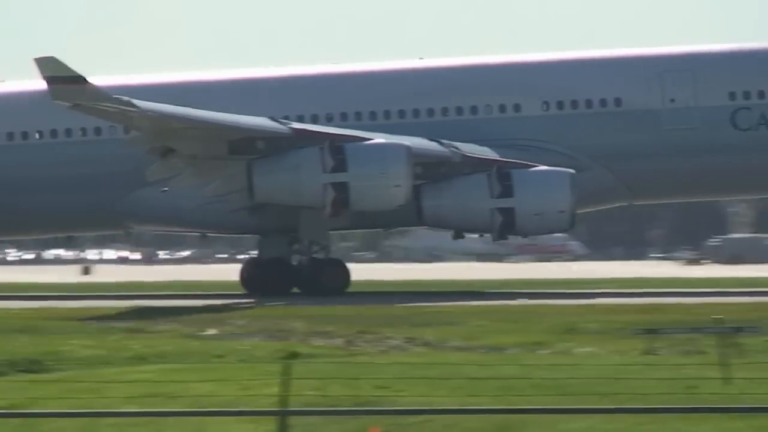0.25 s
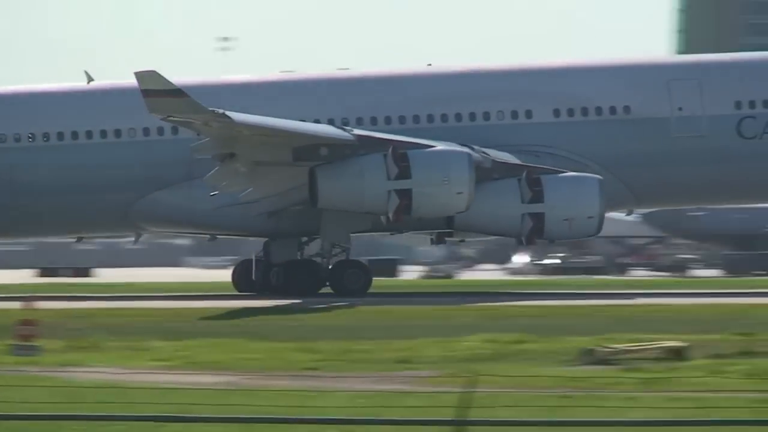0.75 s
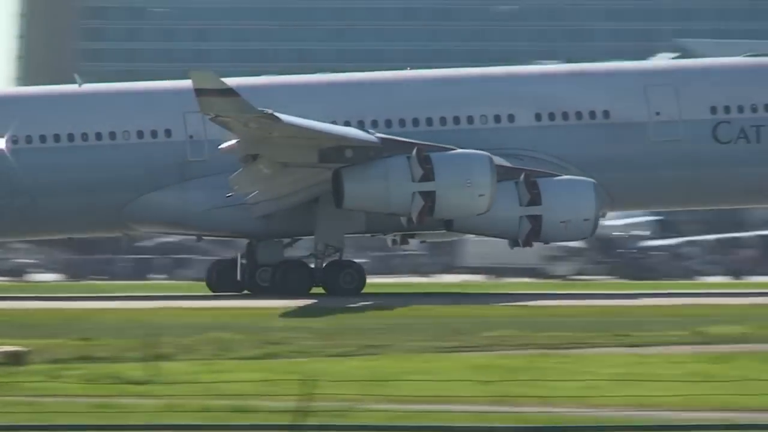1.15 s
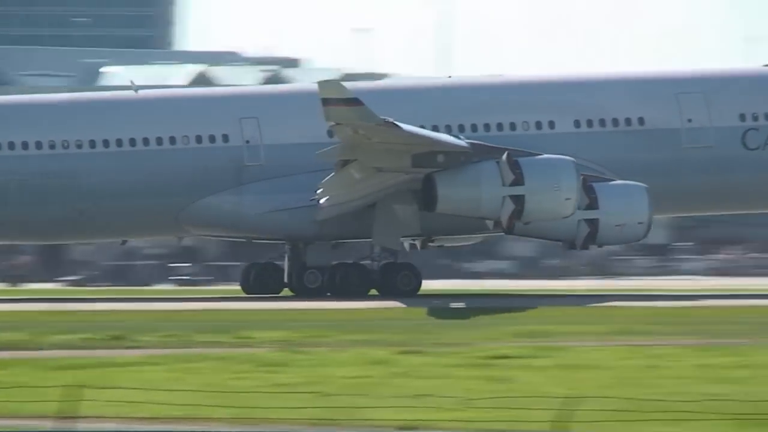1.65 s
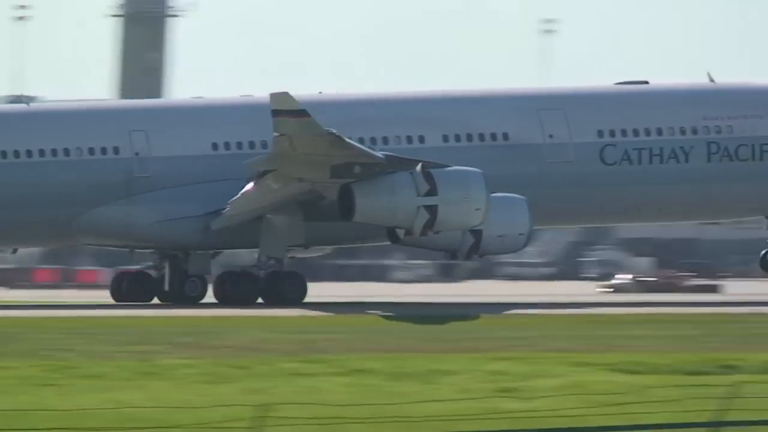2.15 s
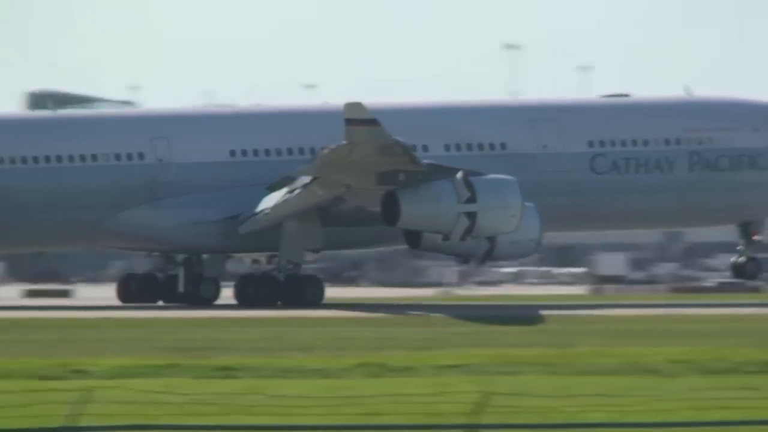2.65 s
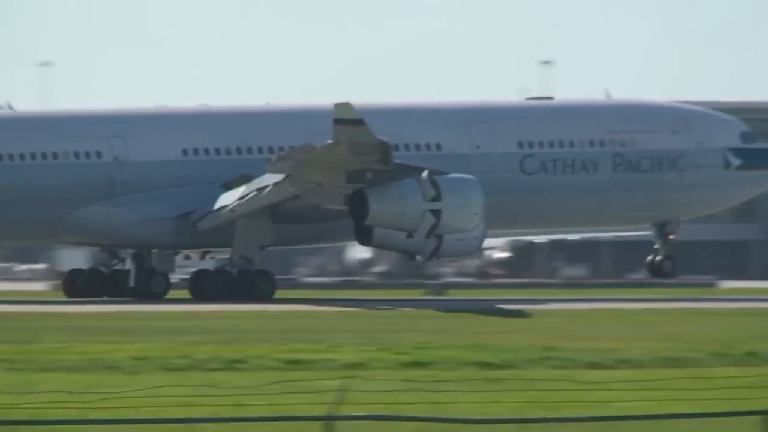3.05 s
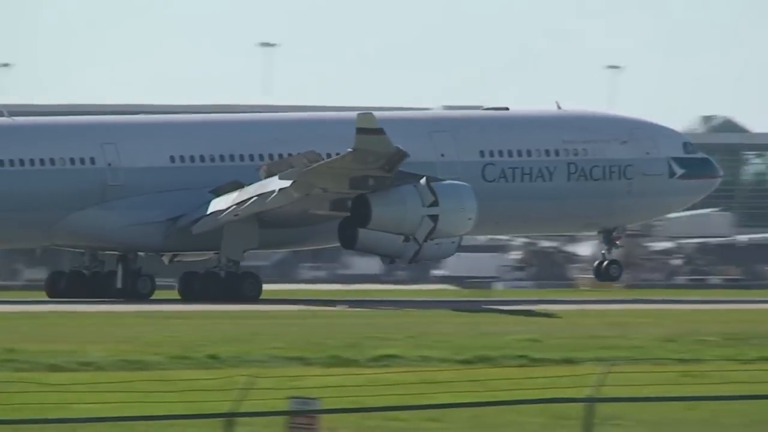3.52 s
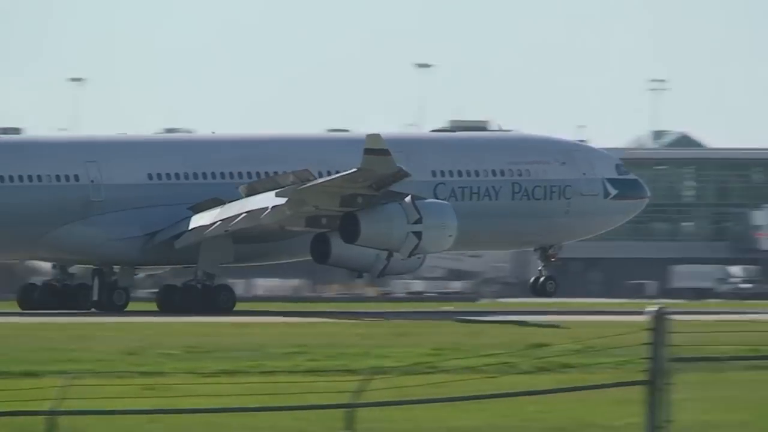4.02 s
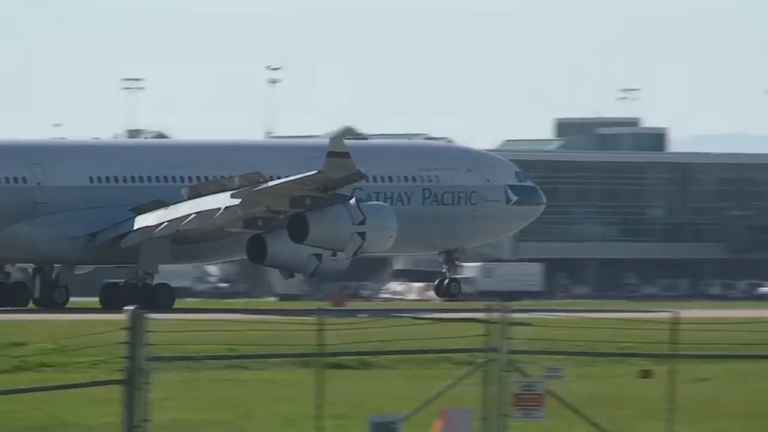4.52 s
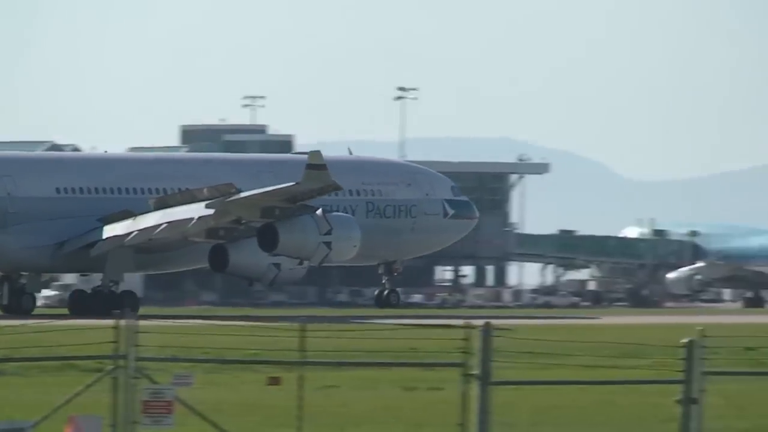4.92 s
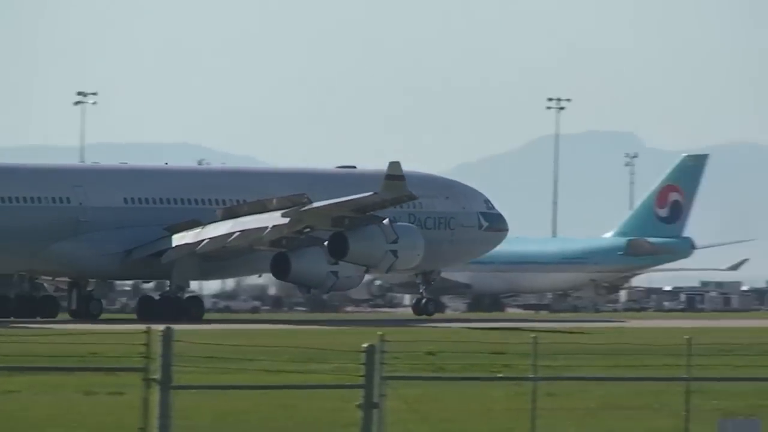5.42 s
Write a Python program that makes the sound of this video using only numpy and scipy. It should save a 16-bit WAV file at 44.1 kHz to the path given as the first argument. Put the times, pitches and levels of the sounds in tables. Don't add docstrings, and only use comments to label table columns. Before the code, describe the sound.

A four-engine jet airliner rolls along a runway with reversers open, heard from a distance across a grassy field. From 0 s there is a broad, windy, mid-heavy roar, at first low and dull. It lifts at about 0.3 s, sags, then surges at 0.75 s. Around 1.1-1.6 s it drops back, with a brighter, thinner edge early on, then rebuilds to a fuller swell at 2.2-3.1 s, where the bass is strongest. It eases after 3.3 s, then grows gradually to its loudest near 4.5 s, before sinking and losing treble until it cuts off still roaring at about 5.7 s. Gusts make it flutter unevenly, while hollow, flanger-like notches slide slowly down. Beneath are a faint fuzzy shaft hum, fading after 3.3 s, a low drone and a slight growing breeze flutter. The small camera microphone adds soft hiss, flattened peaks and barely noticeable ticks, most around 4-4.6 s.

```python
import sys
import numpy as np
from scipy import signal
from scipy.fft import rfft, irfft
from scipy.io import wavfile
from scipy.ndimage import uniform_filter1d

SR = 44100
rng = np.random.default_rng(int(sys.argv[2]) if len(sys.argv) > 2 else 0)


def voltage_ratio(decibels):
    exponent = np.asarray(decibels, float) / 20
    return 10 ** exponent


def persist_wave(psi):
    counts = np.round(np.clip(psi, -1, 1) * 32767).astype(np.int16)
    wavfile.write(sys.argv[1], SR, np.atleast_2d(counts).T)


N = 250443
ABEAM_S = 2.27


def evened(x):
    return x / np.sqrt(np.mean(x ** 2) + 1e-20)


def read(points, hz):
    f, value = np.transpose(points)
    return np.interp(np.log(hz + 1), np.log(f + 1), value)


def follow(rows, t):
    s, *columns = np.transpose(rows)
    return [np.interp(t, s, c) for c in columns]


def echo_db(share, hz, spacing_hz):
    share = np.clip(share, 0, 0.9)
    power = 1 + share ** 2 - 2 * share * np.cos(2 * np.pi * hz / spacing_hz)
    return 10 * np.log10(power / (1 + share ** 2))


def slow(t, lo_hz, hi_hz):
    rates = np.geomspace(lo_hz, hi_hz, 30)
    return evened(sum(np.sin(2 * np.pi * (f * t + rng.random())) for f in rates))


def resonate(x, hz, width_hz):
    turn = np.exp(2j * np.pi * np.cumsum(hz) / SR)
    r = np.exp(-np.pi * width_hz / SR)
    return 2 * (turn * signal.lfilter([1 - r], [1, -r], x / turn)).real


# (start_s, level_db, clearness_db)
CARRY = [(0.0, -34, -4), (0.01, -33, -10), (0.32, -27, -3), (0.58, -33.5, -0.5), (0.74, -23.5, -2),
         (0.99, -29, 3.5), (1.14, -33.5, 6), (1.57, -32.5, -3), (1.74, -29.5, -1), (2.21, -25.5, 1),
         (2.24, -25, 0.5), (2.75, -26.5, 0), (3.04, -24.5, -1), (3.32, -28, 0), (4.46, -22, -2.5),
         (5.2, -27.5, -3), (5.47, -26, -5.5), (5.68, -28.5, -2)]
LAYER_HZ = [400, 1150, 3000, 5600, 9500]


def gusts(t, hz):
    roar_db, fan = follow(CARRY, t)
    rumble = (0.18 - 1) * roar_db - 0.82 * (t - ABEAM_S) ** 2
    blast = 0.81 * (roar_db + fan) - roar_db - 1.92 * t
    rumble, fan, blast = [layer - layer.mean() for layer in (rumble, fan, blast)]
    top = blast + 0.31 * (blast + roar_db - roar_db.mean())
    layers = [rumble, 0 * t, fan, blast, top]
    tilt_db = 0
    for layer, only_this in zip(layers, np.eye(len(LAYER_HZ))):
        tilt_db = tilt_db + read(list(zip(LAYER_HZ, only_this)), hz) * layer
    return roar_db, tilt_db


# (start_s, length_s, pitch_hz, level_db); start is the middle
EDDIES = [(.05, 0.18, 1200, 1), (.28, .16, 1500, 1.5), (.25, .25, 5600, -1.5), (.6, 0.089, 7000, 4),
          (.8, 0.15, 1240, 1), (0.925, 0.065, 3800, 4), (.93, .03, 1500, 4), (1.166, 0.03, 2800, 2),
          (1.038, 0.14, 1310, 3.5), (1.23, 0.26, 755, -3.5), (1.583, 0.093, 625, 5.5), (1.8, 0.23, 8000, 3),
          (1.82, 0.13, 2640, -1.5), (2.396, 0.14, 2760, 3), (2.43, 0.048, 1890, 3), (2.726, 0.042, 2900, 3),
          (3.0, 0.18, 2160, -2.5), (3.128, 0.28, 1180, 1.5), (3.23, 0.13, 615, -5.5),
          (3.316, 0.25, 4600, 3), (3.604, .05, 1200, 2), (3.75, 0.12, 3700, -4), (4.084, .08, 4000, 2),
          (4.13, 0.2, 733, 3.5), (4.5, 0.087, 1390, 0.5), (4.74, .1, 980, 1.5), (5.04, 0.092, 2030, -3),
          (5.21, 0.081, 730, 4.5), (5.377, 0.086, 1500, 2.5), (5.498, .1, 815, -2)]


def passing_eddies(t, hz):
    hump_db = 0
    for s, length_s, f, db in EDDIES:
        octaves = 0.28 * (f / 1000) ** 0.4
        off_pitch = np.log2(hz / f + 1e-3) / octaves
        hump_db = hump_db + db * np.exp(-off_pitch ** 2 - ((t - s) / length_s) ** 2)
    return hump_db


def shimmer(t, hz, patches, patchy_db=0.5, flutter_db=0.63):
    blurred = uniform_filter1d(uniform_filter1d(patches, 16, 0), 12, 1)
    shaken = np.clip(hz / 2000, 0, 1)
    top_flicker = np.clip((hz - 5500) / 3000, 0, 1) * slow(t, 8.5, 40)
    return top_flicker + shaken * (patchy_db * evened(blurred) + flutter_db * slow(t, 4, 25))


def notch_spacing(t):
    steady_hz = 869 - 31.4 * t
    return steady_hz * (1 + 0.012 * slow(t, 0.96, 8))


GROUND_BAND = [(1.2, 0.06), (2.0, 0.27), (3.0, 1.0), (3.6, 0.23), (4.2, 0.11), (5.5, .03)]


def ground_echo(t, hz, spacing_hz):
    far, firmest, firmest_s, spread_s = 0.3, 0.67, 2.05, 1.0
    strength = far + (firmest - far) * np.exp(-((t - firmest_s) / spread_s) ** 2)
    return echo_db(read(GROUND_BAND, hz / spacing_hz) * strength, hz, spacing_hz)


# (multiple_of_spacing, width_hz, level_db)
WING = [
    (3.9, 290, 3),
    (4.35, 290, -2.5),
    (4.85, 230, -1.5),
    (5.6, 330, -4.5),
    (6.45, 230, -1.5),
    (7.3, 210, -2.5),
]


def wing_echo(t, hz, spacing_hz):
    ridges_db = sum(db * np.exp(-((hz - k * spacing_hz) / width_hz) ** 2) for k, width_hz, db in WING)
    return (1.16 - 0.14 * t) * ridges_db


# (pitch_hz, share)
HOUSING = [(4500, 0.0064), (6000, 0.17), (7500, 0.27), (11000, .2)]


def housing_echo(hz):
    return echo_db(read(HOUSING, hz), hz, 1518)


# (pitch_hz, level_db per Hz)
JET = [(25, -36.5), (105, -34), (160, -32.5), (310, -21), (530, -11.5), (800, -5.5), (1230, -0.5),
       (1900, -5.5), (2950, -5.5), (4020, -7), (5300, -16), (6880, -30), (9130, -52), (11500, -71.5),
       (15000, -95.5)]


def engines():
    t = np.arange(N // 256 + 5) * 256 / SR
    hz = np.fft.rfftfreq(1024, 1 / SR)[:, None]
    a, b, patches = rng.standard_normal((len(t), len(hz), 3)).T
    roar_db, tilt_db = gusts(t, hz)
    spacing_hz = notch_spacing(t)
    echoes_db = ground_echo(t, hz, spacing_hz) + wing_echo(t, hz, spacing_hz) + housing_echo(hz)
    colour = voltage_ratio(read(JET, hz) + tilt_db + echoes_db)
    middle = (hz[:, 0] > 800) & (hz[:, 0] < 1600)
    colour /= np.sqrt((colour[middle] ** 2).sum(0))
    grass_hz = 90 + 15 * np.maximum(t - ABEAM_S, 0)
    colour *= np.clip((hz - grass_hz) / 90, 0, 1)
    air = voltage_ratio(roar_db + passing_eddies(t, hz) + shimmer(t, hz, patches))
    roar = signal.istft((a + 1j * b) * colour * air, nperseg=1024, noverlap=768)[1][:N]
    return voltage_ratio(1.98) * roar


def shaft_hum(t):
    level_db = -61.5 - 14 * np.maximum(t - 3.3, 0)
    return voltage_ratio(level_db) * evened(resonate(rng.standard_normal(N), 192 + 0 * t, 7))


# (pitch_hz, level_db per Hz)
DRONE_COLOUR = [(15, -29), (25, -14), (60, -8), (110, 0.5), (135, -1.5), (170, -6), (260, -41.5),
                (500, -100)]


def drone(t):
    level_db = -60 - 0.96 * (t - ABEAM_S) ** 2
    spectrum = rfft(rng.standard_normal(N)) * voltage_ratio(read(DRONE_COLOUR, np.fft.rfftfreq(N, 1 / SR)))
    return voltage_ratio(level_db) * evened(irfft(spectrum, N))


def breeze(t):
    stir = rng.standard_normal(N)
    for _ in range(2):
        stir = resonate(stir, 55 + 0 * t, 50)
    return voltage_ratio(-80 + 1.9 * t) * evened(stir)


def scene():
    t = np.arange(N) / SR
    return (engines() + shaft_hum(t) + drone(t) + breeze(t))[None]


def rounded_peaks(dry):
    knee, softness = 0.25, 0.09
    over = np.maximum(abs(dry) - knee, 0)
    excess = np.sign(dry) * (over - softness * np.tanh(over / softness))
    band = signal.butter(5, [500, 5200], "bandpass", fs=SR, output="sos")
    return dry - signal.sosfiltfilt(band, excess)


def microphone_hiss():
    level_db = -67.5 - 0.75 * np.arange(N) / SR
    return voltage_ratio(level_db) * rng.standard_normal(N)


# (start_s, level_db; the jump itself is 14.5 dB higher)
TICKS = [(0.7672, -56.2), (0.8265, -54.2), (0.8606, -61.4), (1.4638, -59.3), (1.4685, -58.3),
         (2.2618, -54.8), (2.2757, -60.8), (2.2864, -59.8), (2.3775, -61.2), (2.4323, -60.0),
         (2.5302, -60.6), (2.8345, -60.1), (3.0482, -58.7), (3.2778, -59.7), (3.5947, -53.7),
         (4.0141, -55.1), (4.0928, -55.6), (4.2131, -56.7), (4.2269, -53.0), (4.2604, -58.1),
         (4.278, -58.4), (4.3233, -47.5), (4.3876, -52.8), (4.4258, -54.7), (4.5158, -56.8),
         (4.5489, -55.9), (4.6066, -58.0), (4.6292, -61.3)]


def overload_ticks():
    ticks = np.zeros(N)
    s, db = np.transpose(TICKS)
    ticks[np.round(s * SR).astype(int)] = voltage_ratio(db + 14.5) * rng.choice([-1, 1], len(s))
    return ticks


def top_cut(x):
    return signal.sosfilt(signal.butter(12, 15740, fs=SR, output="sos"), x)


def record(dry):
    wet = rounded_peaks(dry) + overload_ticks() + microphone_hiss()
    edge = signal.firwin(511, 15740, window=("kaiser", 9), fs=SR)
    wet = signal.oaconvolve(wet, edge[None], "same")
    wet = wet * np.minimum((N - np.arange(N)) / 6, 1)
    return top_cut(wet)


dry = scene()
out = record(dry)
persist_wave(out)
```